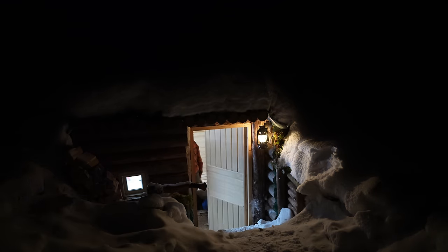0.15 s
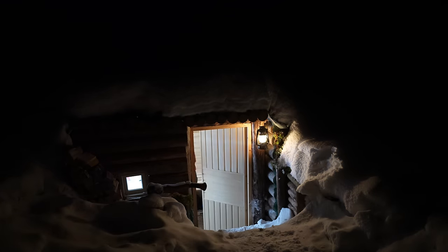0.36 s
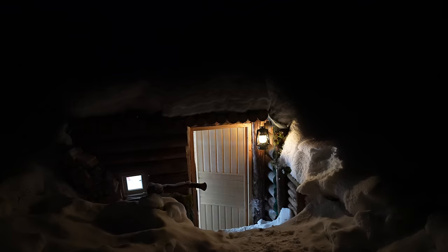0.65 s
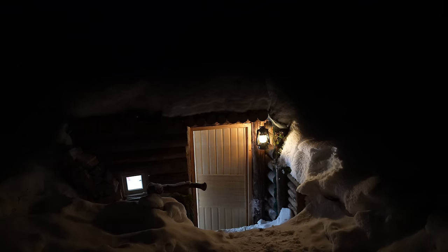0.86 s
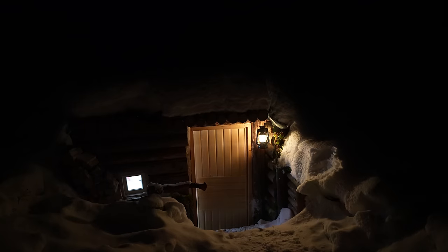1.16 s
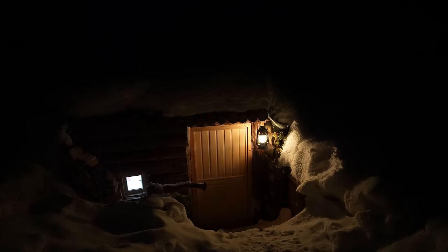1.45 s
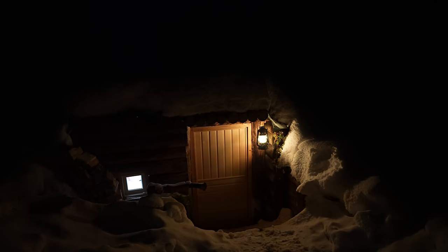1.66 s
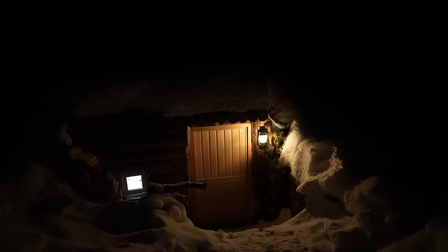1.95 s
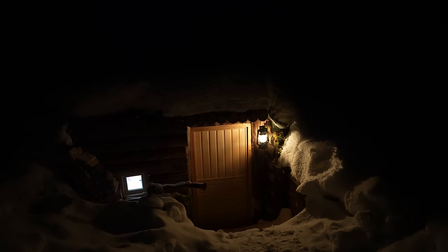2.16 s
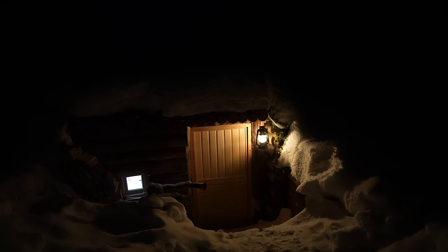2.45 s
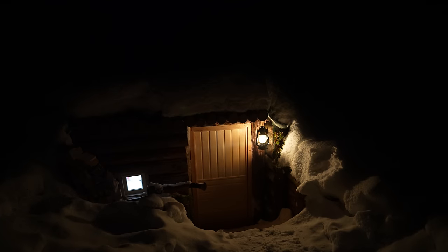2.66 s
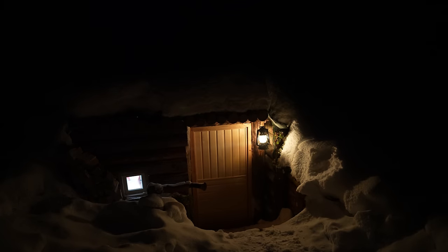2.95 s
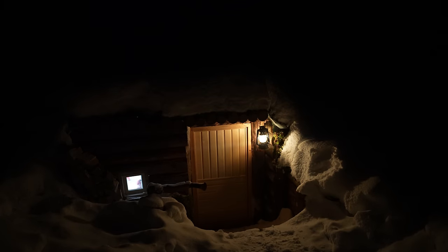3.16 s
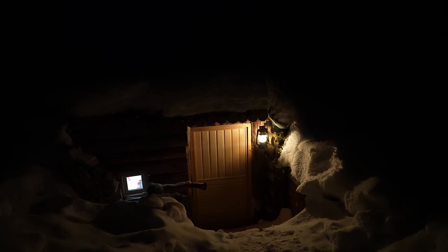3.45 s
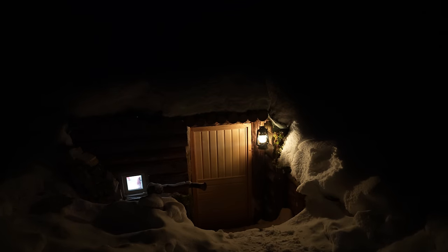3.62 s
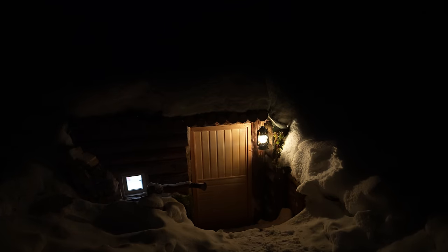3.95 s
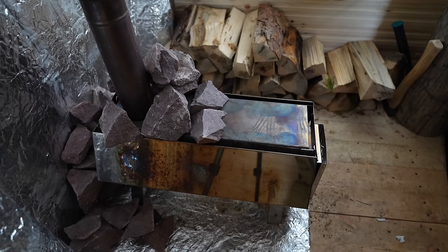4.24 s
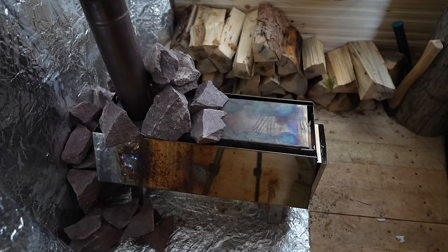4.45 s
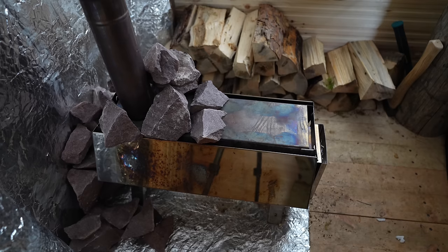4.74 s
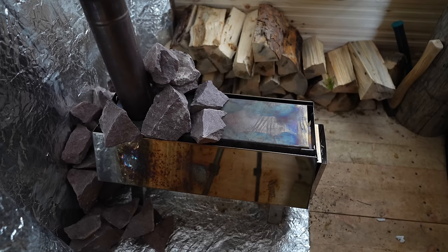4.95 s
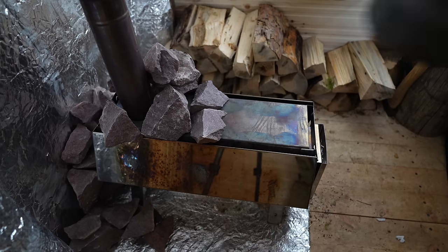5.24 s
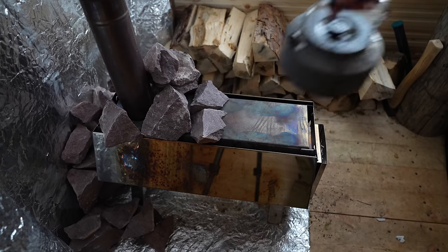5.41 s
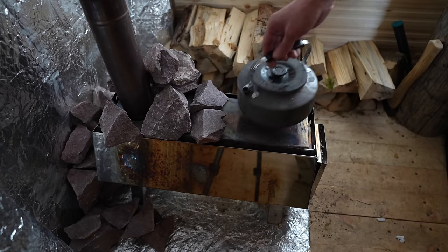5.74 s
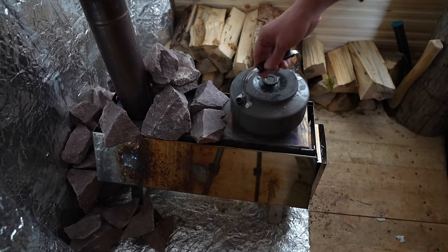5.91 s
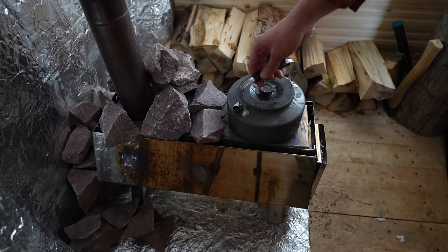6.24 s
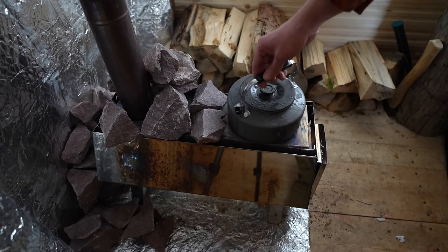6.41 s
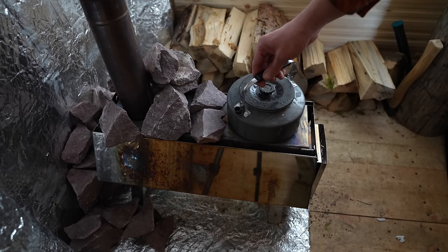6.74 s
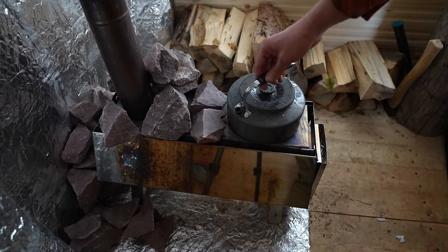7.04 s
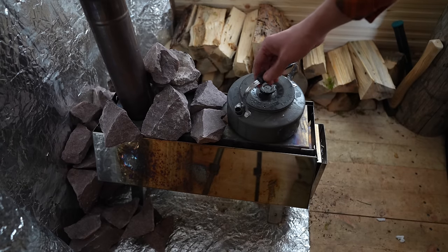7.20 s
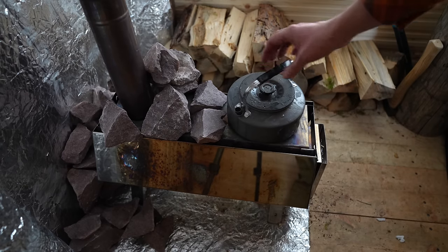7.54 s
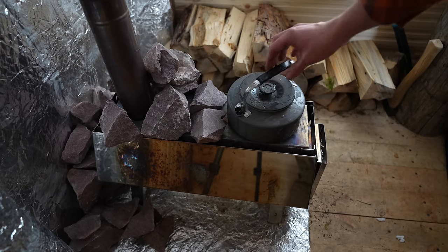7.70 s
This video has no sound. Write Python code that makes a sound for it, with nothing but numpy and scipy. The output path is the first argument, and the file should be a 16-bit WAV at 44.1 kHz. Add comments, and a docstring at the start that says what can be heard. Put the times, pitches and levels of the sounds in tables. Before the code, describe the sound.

Door pulled shut with a thud and scrape, soft footsteps behind a wall, then water sizzling loudly under a kettle set on a stove.

```python
"""Sauna door and wet kettle

On a still winter night a wooden door is pulled shut: it thuds and grinds into its frame by stick-slip
friction, then steps knock behind the wall. The scene moves indoors, where a sleeve rustles, the plank
floor thumps and a wet kettle is set on the hot stove. Water trapped under it flashes to steam, hissing
and spitting, and the handle is let down. Struck wood and metal ring in their damped normal modes."""
import sys
import numpy as np
from scipy import signal
from scipy.fft import rfft, irfft, next_fast_len
from scipy.io import wavfile

SR = 44100
rng = np.random.default_rng(int(sys.argv[2]) if len(sys.argv) > 2 else 0)


def put_to_file(sound):
    """Save the sound as 16-bit audio at rate SR, in the file named by the first command-line argument."""
    columns = np.atleast_2d(sound).T  # one column per channel
    safe = np.clip(columns, -1, 1)
    whole_steps = np.round(safe * 32767)
    wavfile.write(sys.argv[1], SR, whole_steps.astype(np.int16))


N = 347067
TIME = np.arange(N) / SR
SIZE = next_fast_len(N + SR // 4)
FREQS = np.maximum(np.arange(SIZE // 2 + 1) * SR / SIZE, 1)
INDOORS_S, KETTLE_SEATED_S = 4.24, 6.18


# Each row: start in seconds, leaf level in dB, frame level in dB, build-up in seconds.
DOOR_THUDS = [(1.452, -7.5, -40, 0.012), (1.672, -19.5, -2, 0.014), (1.895, -17.5, -27, 0.024),
              (2.198, -29, -57, 0.027)]
# Each row: frequency in Hz, level in dB, 60 dB decay time (t60) in seconds.
LEAF_MODES = [(77.3, -2, 0.27), (72, -8, 0.48), (91, -19, 0.67), (147.5, -21.5, 0.23), (251, -28.5, 0.19),
              (398, -39.5, 0.43), (477, -28.5, 0.11)]
FRAME_MODES = [(48.2, 2.5, 0.14), (120, -8, 0.048), (206.6, -15, 0.099), (342, -39, .2), (415, -36, 0.2),
               (482, -27, 0.11), (545, -41, .11)]
# The door's swish: start in seconds, level in dB, then attack, hold and t60 in seconds.
DOOR_SWING = (0, -57.5, .005, .125, .55)
# Each row: start in seconds, level in dB, hardness in dB per band, t60 in seconds.
DOOR_CONTACTS = [(1.444, -37, -3, 0.12), (1.479, -40.5, 5, 0.039), (1.516, -48.5, -5, .2),
                 (1.6665, -32, 1.5, 0.027), (1.686, -44.5, -8.5, 0.18), (1.752, -54.5, -6, 0.51)]
# Offsets in dB of their thump, body, clack and tick bands.
CONTACT_BANDS_DB = [2, -3.5, -2, -25]

def door():
    """Impact excitation: the door swings to, and leaf and frame boom while the edge grinds shut."""
    thuds = sum(strike(s, leaf_db, LEAF_MODES, build_s) + strike(s, frame_db, FRAME_MODES, build_s)
                for s, leaf_db, frame_db, build_s in DOOR_THUDS)
    swish_colour = colour([(700, -15), (1500, -2), (3200, -2), (4500, -5), (6000, -13)])
    swish = envelope(*DOOR_SWING) * stereo(swish_colour, DIFFUSE)
    contacts = knocks(DOOR_CONTACTS, CONTACT_BANDS_DB, rise_share=0.0093, flicker_db=1)
    return swish + contacts + room(thuds + grind(slips_per_s=260, jitter=0.25), t60=0.1, wet_db=-6)


# The edge binds, grinds louder as pressure builds, then lets go.
# Each row: start and hold in seconds, final level, build-up and rasp level in dB, t60 in seconds.
EDGE_RUBS = [(1.404, .022, -59, 12, -80, .15), (1.442, .008, -41.5, 1.5, -56, 0.086),
             (1.463, 0.017, -37.5, 9, -45.5, 0.033), (1.577, 0.054, -32.5, 27.5, -49.5, 0.17),
             (1.717, 0.014, -44.5, 3.5, -55, .045), (1.776, 0.13, -37, 12, -61, 0.075),
             (1.941, 0.0033, -39, 5, -63, 0.027)]
# Each row: frequency in Hz, width in Hz, level in dB.
RUBBED_WOOD_MODES = [(830, 2000, -17), (1636, 140, 4.5), (1740, 126, 1.5), (2006, 160, -0.5),
                     (2690, 220, -7), (3080, 110, -5), (3410, 72, -5), (3860, 160, -8.5),
                     (4570, 200, -16.5)]

def grind(slips_per_s, jitter, attack_s=0.0033):
    """Stick-slip friction: each uneven slip of the door edge is a gritty burst that excites the wood."""
    slip_samples = np.cumsum(np.exp(jitter * rng.standard_normal(2000)) * SR / slips_per_s).astype(int)
    slips = np.zeros(N)
    slips[slip_samples[slip_samples < N]] = 1
    grip = signal.lfilter([1], [1, -np.exp(-1 / (0.0012 * SR))], slips)  # each slip relaxes in 1.2 ms
    force = rms_one(grip * rng.standard_normal(N) + 2.4 * slips)
    wood = sum((-1) ** k * from_db(db) * signal.lfilter(*signal.iirpeak(hz, hz / width, fs=SR), force)
               for k, (hz, width, db) in enumerate(RUBBED_WOOD_MODES))
    wood = butterworth(wood + from_db(-23.5) * force, 10, 5000, "low")
    wood_gain = together(envelope(s, db, attack_s, hold_s, t60, build_db)
                         for s, hold_s, db, build_db, _, t60 in EDGE_RUBS)
    rasp_gain = together(envelope(s, db, attack_s, hold_s, t60, build_db / 2)
                         for s, hold_s, _, build_db, db, t60 in EDGE_RUBS)
    rasp = stereo(colour([(4000, -13), (5500, 0), (7500, 1), (11000, -6), (15000, -9)]), DIFFUSE)
    return wood_gain * rms_one(wood) + rasp_gain * rms_one(grip + 0.55) * rasp


# Each row: start in seconds, boiling, hiss and spray levels in dB, hold and base t60 in seconds.
STEAM_FLASHES = [(5.833, -35.5, -24.5, -21, 0.015, 0.34), (5.876, -35, -27.5, -36, 0.088, 0.43),
                 (6.071, -39, -30.5, -42, .008, 0.46), (6.168, -30, -20, -20.5, .012, 0.42),
                 (6.196, -26, -20.5, -23.5, 0.021, 0.41), (6.27, -32.5, -21.7, -21.5, 0.024, 0.49),
                 (6.328, -25, -24, -24, 0.0037, 0.18), (6.37, -32, -22, -21, .005, 0.39),
                 (6.438, -35, -23, -21.5, 0.013, 0.37), (6.491, -35.5, -26.5, -25.5, 0.13, 0.53),
                 (6.73, -34.5, -28, -19.5, 0.0091, 0.3), (6.785, -38.5, -36, -49, .01, 0.26),
                 (6.91, -38.5, -34, -32, .014, 0.51), (6.999, -31, -22.5, -20, 0.015, 0.44),
                 (7.15, -42.5, -31.5, -29.5, 0.013, 0.24), (7.244, -44.5, -31, -28.5, .015, .4),
                 (7.386, -39.5, -38, -28, .015, .4), (7.479, -36.5, -31, -23, .015, 0.34),
                 (7.581, -43, -33, -24, .02, .3), (7.617, -35, -22.7, -21, 0.03, 0.3),
                 (7.69, -31.5, -25, -26, 0.017, 0.21), (7.8, -38, -35, -26.5, 0.027, .4)]
# Spray comes first, boiling lingers. Each row (boiling, hiss, spray): attack in seconds, factor on t60.
FLASH_SHAPES = [(0.029, 1.18), (0.026, 1.05), (0.012, 0.69)]
# The film of water simmers harder as it thins. Each row: time in seconds, vigour in dB.
FILM_VIGOUR = [(5.85, -4.5), (6.68, -12), (6.88, -20.5), (7.08, -6.5), (7.45, 2), (7.86, 2)]
# Each row (boiling, hiss, spray): level in dB at a vigour of 0 dB, share of the vigour's swing.
FILM_LAYERS = [(-45, 0.21), (-33, 0.4), (-26, 0.78)]

def steam_levels():
    """Flash evaporation over a simmering film: yields the gains of boiling, hiss and spray."""
    vigour = gain_curve(FILM_VIGOUR)
    for k, ((attack_s, stretch), (simmer_db, share)) in enumerate(zip(FLASH_SHAPES, FILM_LAYERS)):
        flashes = together(envelope(s, levels[k], attack_s, hold_s, stretch * t60)
                           for s, *levels, hold_s, t60 in STEAM_FLASHES)
        yield together([flashes, from_db(simmer_db) * vigour ** share])


# Each row: frequency in Hz, relative spectral density in dB.
BOIL_SPECTRUM = [(60, -22.5), (170, -9), (300, -9.5), (430, -3.5), (560, -6), (800, -1.5), (1100, 0),
                 (1430, 1), (1750, 2), (2000, 0), (2600, -7.5)]
HISS_SPECTRUM = [(1500, -40), (2050, -1.5), (3050, 0), (4000, 0), (5300, -0.5), (7000, 1), (9000, -3.5),
                 (11300, 1), (13000, -9.5)]
SPRAY_SPECTRUM = [(4000, -1.5), (10000, -2.5), (12000, -5), (13600, 4.5), (15400, 3), (17500, -10.5)]
# Peaks and notches of kettle and stove. Each row: frequency in Hz, width in Hz, gain in dB.
KETTLE_RESPONSE = [(344, 25, 2), (441, 25, 5), (506, 28, -4), (549, 25, 4), (618, 40, -7), (656, 25, 5),
                   (958, 25, 4), (1090, 30, 5), (1141, 35, 5), (1356, 25, -4), (1460, 55, -5),
                   (1672, 22, 5), (1748, 20, 7), (1805, 25, -4), (1868, 22, 4), (2013, 25, 4),
                   (3025, 60, 5), (3143, 25, 4), (3434, 30, 4), (3531, 25, -4), (3612, 20, 4),
                   (3779, 30, 4.5), (4840, 50, 4), (5180, 55, 4.5), (5408, 35, 5), (8040, 30, 5)]
# Single drops spit on the plate. Each row: start in seconds, relative level in dB.
SPITS = [(6.1757, -13), (6.3129, -6), (6.3857, -1), (6.4386, -15), (6.45, -6), (6.9474, -11), (7.015, -13),
         (7.3426, -1), (7.582, -24), (7.7795, -21)]

def sizzle():
    """Source and filter: boiling, hiss and spray sputter together, coloured by kettle and stove."""
    boil_gain, hiss_gain, spray_gain = steam_levels()
    kettle = ripple(KETTLE_RESPONSE)
    sputter = flutter(23)

    def jet(spectrum, per_s, spread_db, steam_db):
        """Shot noise: droplets burst over a smooth jet of steam."""
        droplets = np.array([rms_one(grains(per_s, spread_db)) for _ in range(2)])
        source = droplets + from_db(steam_db) * rng.standard_normal((2, N))
        return stereo(kettle * colour(spectrum), DIRECT, source)

    boil = boil_gain * from_db(1.3 * sputter) * jet(BOIL_SPECTRUM, 3000, 3.9, 0.1)
    hiss = hiss_gain * from_db(-1.74 + 1.3 * sputter) * jet(HISS_SPECTRUM, 5000, 2.3, 1.6)
    spray = spray_gain * jet(SPRAY_SPECTRUM, 2500, 4.5, 2)
    spray *= from_db(-1.03 + 1.16 * sputter + 0.7 * flutter(150))
    tones = singing(boil_gain, hiss_gain, kettle)
    spits = snaps(SPITS, t60=0.0062, level_db=-12)
    fade_in = np.clip((TIME - STEAM_FLASHES[0][0]) / FLASH_SHAPES[-1][0], 0, 1)
    return fade_in * (boil * pan(-0.58) + tones + hiss * pan(-0.55) + (spray + spits) * pan(-3))


# Each row: frequency in Hz, width in Hz, level in dB.
RING_MODES = [(1244, 30, 3), (1290, 40, -11), (1670, 35, -8), (1752, 35, -7)]
WHISTLE_MODES = [(2900, 400, 0.5), (3390, 310, 1.5), (5360, 660, 2)]
# Ringing driven by the film: level in dB at a vigour of 0 dB, share of the vigour's swing.
FILM_RING = (-44.5, 0.61)
# Each row: time in seconds, gain of the whistle relative to the hiss gain in dB.
WHISTLE_SHARE = [(6.2, -10), (6.4, -15), (6.52, -6.5), (6.85, -4.5), (7.1, -8), (7.6, -20)]

def singing(boil_gain, hiss_gain, kettle, ring_db=-9):
    """Forced resonance: boiling rings the seated kettle and steam whistles in the gap under it."""
    film_db, share = FILM_RING
    film_gain = from_db(film_db) * gain_curve(FILM_VIGOUR) ** share
    ring = together([boil_gain * from_db(ring_db), film_gain]) * stereo(resonances(RING_MODES), DIRECT)
    whistle = hiss_gain * gain_curve(WHISTLE_SHARE) * stereo(kettle * resonances(WHISTLE_MODES), DIRECT)
    return (TIME > KETTLE_SEATED_S) * (ring + whistle)


# A heavy step lands; steam lifts the kettle, which bumps the stove. Each row: start in seconds, level in dB.
HEAVY_STEP = [(5.362, -15.5), (5.390, -27.5)]
KETTLE_BUMPS = [(6.203, -40.5), (6.274, -51), (6.395, -38), (6.429, -39), (6.769, -39.5), (7.023, -38.5),
                (7.66, -48), (7.82, -51)]
# Each row: frequency in Hz, level in dB, t60 in seconds.
PLANK_MODES = [(59, -14, .15), (168.4, -1, 0.17), (206, 4.5, 0.093), (335, -5, 0.057), (647, -15, 0.075),
               (864, -18.5, 0.065)]
STOVE_TOP_MODES = [(101, -3.5, 0.29), (171.6, 1, 0.46), (213, -11, 0.9), (337.3, -4, 0.34), (453, -3, 0.44)]

def thumps():
    """Plate vibration: the struck plank floor and stove top sound their low modes."""
    floor = sum(strike(s, db, PLANK_MODES, build_s=0.027) for s, db in HEAVY_STEP)
    stove = sum(strike(s, db, STOVE_TOP_MODES, build_s=0.0066) for s, db in KETTLE_BUMPS)
    return room(floor + stove, t60=0.4, wet_db=-23)


# Each row: start in seconds, level in dB.
CLANKS = [(6.232, -56), (6.345, -54), (6.384, -42), (7.640, -40.5), (7.687, -27), (7.708, -28.5)]
# Each row: frequency in Hz, level in dB, t60 in seconds.
CLANK_MODES = [(259, -9.5, .13), (351, 3, .069), (372, -3, .096), (774, 1, .11), (866, -1, .11),
               (1090, 0, .091), (1116, -4.5, .12), (1244, -4, .12), (1420, -9, .12), (1550, -9, .12),
               (1816, -6, .14), (2220, -12, .14), (3180, -3, .11)]

def kettle_clanks():
    """Inharmonic modes: the kettle clanks as it rocks and as its handle drops."""
    clanks = sum(strike(s, db, CLANK_MODES, build_s=0.0039) for s, db in CLANKS)
    return room(clanks, t60=0.07, wet_db=-8.5)


# Each row: start in seconds, level in dB, hardness in dB per band, t60 in seconds.
FOOTSTEPS = [(.362, -45.5, 1, 0.19), (.998, -57, -6.5, 0.21), (1.04, -61.5, 8, .08),
             (2.024, -56.5, 6.5, .07), (2.192, -48.5, -3, 0.23), (2.595, -57, 6, 0.074),
             (2.71, -57.5, -10.5, .13), (3.008, -62.5, 6.5, .11), (3.175, -49, 3.5, .12),
             (3.195, -48, 0, 0.17), (3.4, -58.5, -5.5, 0.18), (3.53, -54, 1.5, .19),
             (3.565, -51.5, 0.5, 0.49), (3.615, -52, 6.5, .2), (3.725, -54, -6, 0.15),
             (4.031, -51.5, -3, 0.15), (4.106, -54, -3, 0.24)]
FETCHING_KNOCKS = [(4.244, -49.5, 1, 0.36), (4.289, -38.5, 0, .14), (4.873, -58.5, 8, 0.18),
                   (5.16, -53.5, 6.5, 0.32), (5.19, -37, 0, 0.18), (5.219, -38, -0.5, 0.12),
                   (5.294, -38.5, -2, 0.19), (5.314, -38.5, -1, 0.18), (5.335, -41, -1, 0.11),
                   (5.357, -41, -5, 0.1), (5.43, -43, -5, 0.24), (5.485, -46.5, 0, 0.2),
                   (5.527, -45.5, 0, 0.19), (5.631, -44.5, 2.5, 0.2)]
# Offsets in dB of their thump, body, clack and tick bands.
FOOTSTEP_BANDS_DB = [-1.5, -1, -6.5, -17]
FETCHING_BANDS_DB = [-8, 0, 0.5, -6]

def steps_and_fetching(wall_hz):
    """Transmission loss: the log wall muffles the steps; indoors, fetching the kettle knocks clearly."""
    steps = knocks(FOOTSTEPS, FOOTSTEP_BANDS_DB, rise_share=0.024, flicker_db=2)
    fetching = knocks(FETCHING_KNOCKS, FETCHING_BANDS_DB, rise_share=0.022, flicker_db=0.5)
    return (butterworth(steps, 4, wall_hz, "low") + fetching) * pan(-1.1)


# Thump, body, clack and tick bands. Each point: frequency in Hz, relative spectral density in dB.
KNOCK_SPECTRA = [
    [(20, -14), (50, 0), (110, 3.5), (180, 0.5)],
    [(90, -32), (170, -9.5), (360, -3), (640, -8), (950, -31)],
    [(500, -4.5), (800, 3), (1250, -4), (1850, -4.5), (2500, -6.5), (3800, -12), (5500, -46)],
    [(2800, -13), (4400, -6), (9000, -10), (16000, -14)],
]
# Peaks and notches of the wooden hut. Each row: frequency in Hz, width in Hz, gain in dB.
HUT_RESPONSE = [(282, 17, -3), (327, 34, 7), (646, 26, 6.5), (795, 73, -6.5), (1070, 160, -5),
                (1147, 48, 7), (1680, 88, 4), (2140, 60, -7), (2260, 40, 0.5), (2454, 170, -7),
                (3100, 60, 8), (3340, 60, 0)]

def knocks(rows, bands_db, rise_share, flicker_db):
    """Modal overlap: dense wooden modes merge into decaying noise, brighter for harder blows."""
    out, hut = 0, ripple(HUT_RESPONSE)
    for k, (spectrum, trim_db) in enumerate(zip(KNOCK_SPECTRA, [4.3, 1.3, 3.4, 5.8])):
        power = np.zeros(N)
        for s, db, hardness_db, t60 in rows:
            level_db = db + bands_db[k] + hardness_db * (k - 1) + trim_db
            start = int(s * SR)
            t = TIME[:min(SR // 2, N - start)]
            rise = 1 - np.exp(-t / (rise_share * t60))
            power[start:start + len(t)] += (rise * from_db(level_db - 60 * t / t60)) ** 2
        out = out + np.sqrt(power) * stereo(hut * colour(spectrum), DIRECT)
    return out * from_db(flicker_db * flutter(110))


# Each row: start in seconds, level in dB, then attack, hold and t60 in seconds. The sleeve has one row.
BODY_MOVES = [(4.505, -41, .12, 0.057, 1.3), (5.124, -43.5, 0.15, 0.39, .8),
              (5.708, -44.5, 0.056, .02, 0.77)]
SLEEVE_SWISH = (5.08, -52.5, .07, .09, 1.0)
# Each row: frequency in Hz, relative spectral density in dB.
CLOTH_SPECTRUM = [(88, -57), (150, -21), (290, -19.5), (381, -4), (481, -14.5), (656, -1), (781, -10.5),
                  (1060, -1), (1170, -7.5), (1800, -4), (1980, -6.5), (5230, -8), (15500, -14.5)]

def clothes(rest_db=-51.5):
    """Friction noise: cloth rustles with each move, and a sleeve swishes as the kettle is lifted."""
    motion = together([from_db(rest_db)] + [envelope(*move) for move in BODY_MOVES])
    rustle = motion * from_db(-4 + 0.48 * flutter(32)) * stereo(colour(CLOTH_SPECTRUM), DIFFUSE)
    sleeve_colour = colour([(8000, -13), (10800, 2), (12500, -4), (14500, -13)])
    return rustle * pan(-3) + envelope(*SLEEVE_SWISH) * stereo(sleeve_colour, DIFFUSE)


# Each row: start in seconds, relative level in dB.
OUTDOOR_TICKS = [(0.626, -37), (1.0836, -36), (1.1564, -27.5), (2.601, -31.5), (2.6289, -38), (3.1108, -42),
                 (3.238, -41), (3.8896, -51)]

def ticking(per_s, faint_db):
    """Sparse transients: a few clear ticks outdoors, with fainter ones scattered at random."""
    draws = rng.random((int(per_s * INDOORS_S), 2))
    faint = [(INDOORS_S * when, faint_db + 6 * size) for when, size in draws]
    return snaps(OUTDOOR_TICKS, t60=0.0094, level_db=-3.5) + snaps(faint, t60=0.0072, level_db=1)


# Each row: frequency in Hz, relative spectral density in dB.
NIGHT_SPECTRUM = [(12, -35), (20, -2.5), (50, -5.5), (90, -13.5), (167, -14), (292, -16), (386, -20.5),
                  (443, -21), (586, -23), (843, -28), (1350, -33), (2240, -31.5), (3400, -31), (5950, -26),
                  (15800, -23)]
STOVE_HUSH_SPECTRUM = [(12, -37), (20, 5), (52, -11.5), (74, -5.5), (345, -19.5), (397, -55), (456, -19),
                       (603, -39), (1250, -66.5), (1470, -10), (2650, -19), (9830, -17), (15800, -27)]

def background():
    """Ambient noise: faint hiss and rumble outdoors, then the stove's hush and the clothes indoors."""
    night = from_db(-53) * stereo(colour(NIGHT_SPECTRUM), DIFFUSE) * pan(-1.7)
    hush = from_db(-57.3) * stereo(colour(STOVE_HUSH_SPECTRUM), DIFFUSE) * pan(-1.3)
    return np.where(TIME < INDOORS_S, night, hush + clothes())


def strike(s, level_db, modes, build_s):
    """Free vibration: damped modes start at time s, the low ones building up more slowly."""
    out, start = np.zeros(N), int(s * SR)
    t = TIME[:min(SR, N - start)]
    for hz, mode_db, t60 in modes:
        swell = 1 - np.exp(-t * hz / (build_s * modes[0][0]))
        decay = from_db(level_db + mode_db - 60 * t / t60)
        out[start:start + len(t)] -= swell * decay * np.sin(2 * np.pi * hz * t)
    return out


def snaps(rows, t60, level_db):
    """Exponential decay: each onset releases a tiny burst of bright noise."""
    onsets = np.zeros(N)
    onsets[[int(s * SR) for s, _ in rows]] = from_db(np.array(rows)[:, 1] + level_db)
    fade = signal.lfilter([1], [1, -from_db(-60 / (t60 * SR))], onsets + 1e-18)
    return fade * stereo(colour([(2500, -7), (6000, -5.5), (16000, 2.5)]), DIFFUSE)


def grains(per_s, spread_db):
    """Poisson process: random clicks of widely varying size."""
    born = rng.random(N) < per_s / SR
    sizes = from_db(spread_db * np.minimum(rng.exponential(1, N), 3.3))
    return born * sizes * rng.choice([-1, 1], N)


def room(x, t60, wet_db):
    """Reverberation: log walls add dense, short reflections, different at each ear."""
    t = TIME[:SR // 2]
    tail = rng.standard_normal((2, len(t))) * from_db(-60 * t / t60) * (t > 0.003)
    tail = butterworth(tail, 2, 250, "high")
    tail /= np.sqrt(np.sum(tail ** 2, axis=1, keepdims=True))
    return x + from_db(wet_db) * signal.fftconvolve(np.atleast_2d(x), tail, axes=1)[:, :N]


# Each row: frequency in Hz, correlation between the two channels.
DIRECT = [(100, 1), (300, 1), (700, 0.79), (1300, 0.74), (2400, 0.51), (4400, 0.19), (9000, 0.11)]
DIFFUSE = [(60, 1), (200, 0.93), (400, 0.44), (800, 0.079), (2000, 0.028), (6000, .02)]

def stereo(gain, correlation, source=None):
    """Partial coherence: two unrelated signals (default white noise) mix into a pair of unit power."""
    if source is None:
        mid, side = rng.standard_normal((2, 2 * len(FREQS))).view(complex)
    else:
        mid, side = rfft(source, SIZE)
    alike = np.clip(across_hz(correlation), -1, 1)
    mid, side = mid * gain * np.sqrt(1 + alike), side * gain * np.sqrt(1 - alike)
    return rms_one(irfft([mid + side, mid - side], SIZE)[:, :N])


def pan(left_db):
    """Level difference: channel gains with the left louder by left_db."""
    return from_db(np.array([[left_db], [-left_db]]) / 2)


def envelope(s, db, attack_s, hold_s, t60, build_db=0):
    """Amplitude envelope: the level climbs by build_db to db over attack and hold, then decays."""
    out, start = np.zeros(N), int(s * SR)
    t = TIME[:min(SR, N - start)]
    end = attack_s + hold_s
    level_db = db - build_db * np.maximum(1 - t / end, 0) - 60 * np.maximum(t - end, 0) / t60
    out[start:start + len(t)] = np.minimum(t / attack_s, 1) * from_db(level_db)
    return out


def gain_curve(points):
    """Interpolation of (seconds, dB) points into a gain, held beyond the ends."""
    return from_db(np.interp(TIME, *np.transpose(points)))


def flutter(hz):
    """Random modulation: noise of unit power, smoothed above hz."""
    return rms_one(irfft(rfft(rng.standard_normal(N), SIZE) / (1 + (FREQS / hz) ** 2), SIZE)[:N])


def resonances(modes):
    """Resonance curves: a sum of peaks with deep valleys between."""
    return sum(from_db(db) / (1 + (1.4 * (FREQS - hz) / width) ** 2) for hz, width, db in modes)


def ripple(modes):
    """Frequency response: peaks and notches on a flat gain."""
    return from_db(sum(db / (1 + (2 * (FREQS - hz) / width) ** 2) for hz, width, db in modes))


def colour(points):
    """Spectral envelope through (Hz, dB) points, falling 12 dB per octave outside them."""
    skirts = np.minimum(FREQS / points[0][0], 1) * np.minimum(points[-1][0] / FREQS, 1)
    return from_db(across_hz(points)) * skirts ** 2


def across_hz(points):
    """Interpolation of (Hz, value) points on a log-frequency axis."""
    hz, value = np.transpose(points)
    return np.interp(np.log(FREQS), np.log(hz), value)


def butterworth(x, order, hz, kind):
    """Maximally flat low-pass or high-pass filtering."""
    return signal.sosfilt(signal.butter(order, hz, kind, fs=SR, output="sos"), x)


def together(envelopes):
    """Incoherent addition: unrelated sounds add in power."""
    return np.sqrt(sum(e ** 2 for e in envelopes))


def from_db(db):
    """Decibels to amplitude ratio."""
    return 10 ** (np.asarray(db) / 20)


def rms_one(x):
    """Normalisation to unit power."""
    return x / np.sqrt(np.mean(x ** 2) + 1e-20)


def scene():
    """Superposition: the pressures of all sources add."""
    return (background() + door() + steps_and_fetching(wall_hz=2640) + ticking(per_s=4.9, faint_db=-48)
            + thumps() + kettle_clanks() + sizzle())


def record(dry):
    """Band limiting: the treble is cut steeply above 15.9 kHz."""
    return irfft(rfft(dry, SIZE) / np.sqrt(1 + (FREQS / 15900) ** 400), SIZE)[:, :N]


dry = scene()
out = record(dry)
put_to_file(out)
```